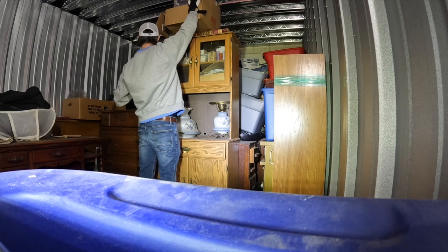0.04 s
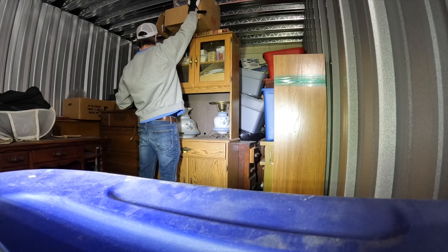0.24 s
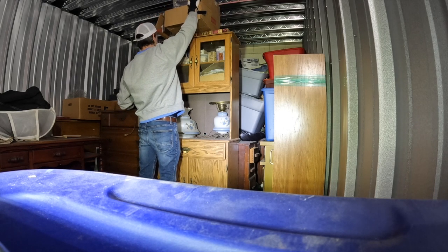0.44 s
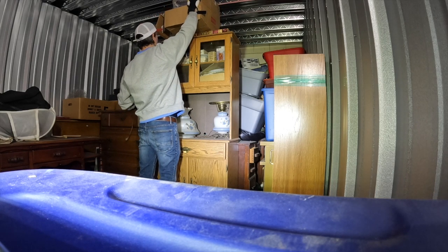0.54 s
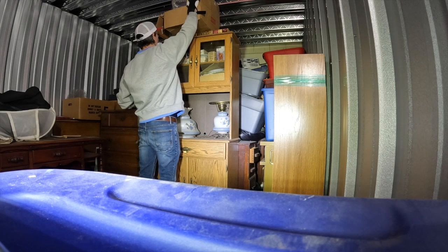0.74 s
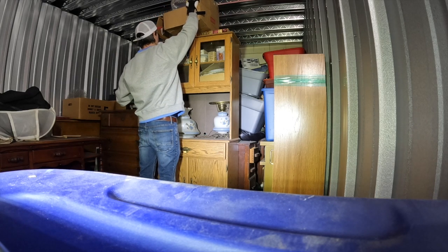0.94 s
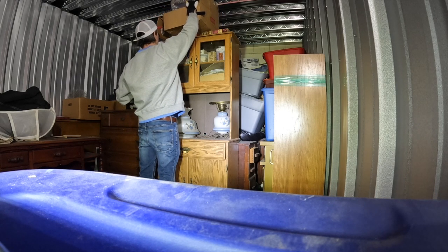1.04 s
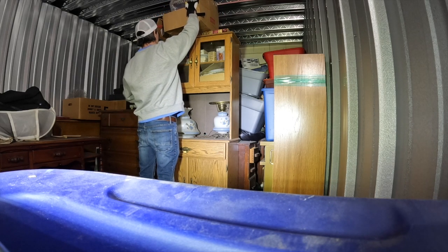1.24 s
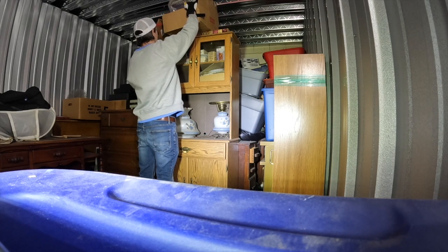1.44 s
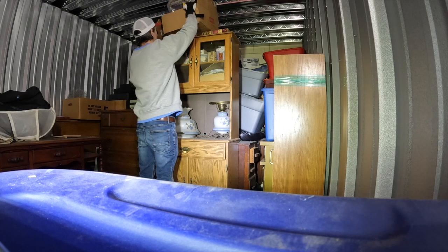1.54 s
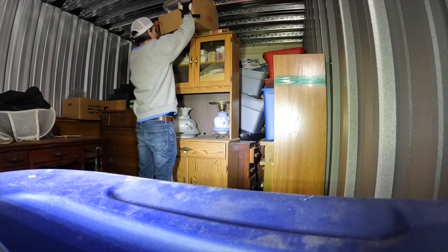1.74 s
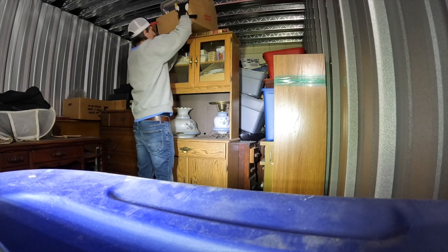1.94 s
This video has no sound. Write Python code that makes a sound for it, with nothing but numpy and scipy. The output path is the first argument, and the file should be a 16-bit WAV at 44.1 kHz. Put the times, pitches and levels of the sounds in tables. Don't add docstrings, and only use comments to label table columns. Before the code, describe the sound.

Three loud box knocks on wood in under a second, with a small corner bounce after the first, then quiet ticks, sleeve rustle and cardboard scraping, heard by a small camera microphone in a sheet-metal storage space.

```python
import sys
import numpy as np
from scipy import signal
from scipy.fft import rfft, irfft, next_fast_len
from scipy.io import wavfile
from scipy.ndimage import map_coordinates

SR = 44100
rng = np.random.default_rng(int(sys.argv[2]) if len(sys.argv) > 2 else 0)


def generate_wav(sig):
    pcm = np.round(np.clip(np.atleast_2d(sig).T, -1, 1) * 32767).astype(np.int16)
    wavfile.write(sys.argv[1], SR, pcm)


def how_loud(loudness_db):
    steps = np.asarray(loudness_db, float) / 20
    return 10 ** steps


N = 88200
SWELL_CYCLES = 1.59


def unit(x):
    return x / np.sqrt(np.mean(x ** 2) + 1e-20)


def along(points, hz):
    f, v = np.transpose(points)
    return np.interp(np.log(hz + 1), np.log(f + 1), v)


def curves(rows):
    s, *columns = np.transpose(rows)
    return [np.interp(np.arange(N) / SR, s, column) for column in columns]


def filtered(x, response):
    m = next_fast_len(N + 8192)
    return irfft(rfft(x, m) * response(np.fft.rfftfreq(m, 1 / SR)), m)[:N]


def shaped(points):
    return unit(filtered(rng.standard_normal(N), lambda hz: how_loud(along(points, hz))))


def resonant(peaks):
    def response(f):
        total = 0
        for k, (centre, width, db) in enumerate(peaks):
            peak = 1j * f * width / (centre * centre - f * f + 1j * f * width)
            total = total + (-1) ** k * how_loud(db) * peak
        return total
    return response


def add(track, s, sound):
    i = round(s * SR)
    sound = sound[max(-i, 0):][:N - max(i, 0)]
    track[max(i, 0):][:len(sound)] += sound


def swelling_mode(t, hz, t60, db):
    swell = 1 - np.exp(-t * hz / SWELL_CYCLES)
    return how_loud(db - 60 * t / t60) * np.sin(2 * np.pi * hz * t) * swell


def burst(colour_db, rise, hold, late_db=0):
    # frequency in Hz, time to fall by 60 dB in seconds, for the early sound.
    early_t60 = [(100, 0.41), (500, 0.18), (2000, 0.26), (5000, 0.34), (12000, 0.23)]
    # frequency in Hz, time to fall by 60 dB in seconds, for the late echoes.
    late_t60 = [(70, 1.9), (200, 1.66), (1000, 0.99), (4000, 0.4), (12000, .6)]
    # frequency in Hz, level of the late echoes in dB relative to the early sound.
    late_level = [(70, -35), (150, -19.5), (500, -17.5), (2000, -12.5), (10000, -66)]
    pad = np.zeros(N)
    pad[:SR] = rng.standard_normal(SR)
    noise = filtered(pad, lambda hz: how_loud(colour_db(hz)))[:SR]
    hz, t, bands = signal.stft(unit(noise), SR, nperseg=256)
    after = np.maximum(t - hold, 0)
    early_fall = how_loud(-60 * after / along(early_t60, hz)[:, None])
    late_start_db = late_db + along(late_level, hz)[:, None]
    late_fall = how_loud(late_start_db - 60 * after / along(late_t60, hz)[:, None])
    sound = signal.istft(bands * (early_fall + late_fall), SR, nperseg=256)[1][:SR]
    u = np.arange(SR) / SR
    fade_out = np.minimum(1, 10 * (1 - u))
    return sound * (1 - np.exp(-u / rise)) * fade_out


def thumps():
    # start in seconds, clatter level in dB, rise in seconds, hold in seconds, scuff level in dB.
    landings = [
        (.2375, -19.5, 0.00033, 0.062, -29.5),
        (.500, -27, 0.0039, 0.033, -45),
        (.746, -22, 0.0029, 0.051, -36.5),
    ]
    # frequency in Hz, level in dB per Hz.
    clatter_colours = [
        [(50, -14.5), (200, 2.5), (400, -3.5), (1000, -5), (1500, -7.5), (2200, -16), (5300, -22),
         (15000, -35.5)],
        [(50, -6), (200, -3.5), (500, -1.5), (1000, -9), (1500, -11), (3200, -18), (5300, -26.5),
         (15000, -41.5)],
        [(50, -6.5), (200, 0.5), (450, -2.5), (1000, -5.5), (1500, -13), (3200, -21), (5300, -28.5),
         (15000, -38.5)],
    ]
    crack_db = [
        -7,
        -10,
        -35,
    ]
    # frequency in Hz, level in dB per Hz.
    scuff_colour = [(250, -28), (800, -12), (1300, -13), (2000, -17), (3500, -24.5), (12000, -39.5)]
    # frequency in Hz, time to fall by 60 dB in seconds, level in dB in thumps 1,
    # 2 and 3.
    ringing_modes = [(68.9, 0.37, -10.5, -56, -10.5), (82, 0.31, -9.5, -16.5, -22.5),
                     (75.6, 0.36, -27.5, -12, -42), (129.4, 0.49, -21, -30, -46), (147.9, 0.32, -18, -29, -16),
                     (161.4, 0.31, -32.5, -28, -20.5), (177.2, 0.32, -35.5, -31, -21),
                     (249.5, 0.221, -12, -22.5, -29.5), (273.2, 0.26, -14, -21, -16),
                     (333.7, 0.34, -41, -27, -48), (414, 0.24, -28, -14, -22), (428, 0.24, -26, -19.5, -18),
                     (496, 0.48, -55, -34, -27.5), (543, 0.3, -36, -28.5, -50), (638, 0.11, -31, -35, -21),
                     (754.4, 0.58, -27, -57, -48), (797, 0.36, -46, -31, -31), (829, 0.24, -45, -54, -38),
                     (899, 0.34, -35, -31.5, -24), (977, 0.48, -26.5, -40, -27.5),
                     (1050, 0.21, -43.5, -34, -17.5), (1143, 0.3, -41, -46, -38),
                     (1214, 0.11, -40, -46, -35), (1328, 0.11, -18.5, -37, -48), (1434, 0.1, -24, -41, -49)]
    crack_s, scuff_s, scuff_rise_db = 0.0089, 0.03, 33
    scuff_n = round(scuff_s * SR)
    out, t = np.zeros(N), np.arange(SR // 2) / SR
    for k, (s, db, rise, hold, scuff_db) in enumerate(landings):
        clatter = burst(lambda hz: along(clatter_colours[k], hz), rise, hold)
        crack = how_loud(crack_db[k]) * np.exp(-np.arange(SR) / SR / crack_s)
        add(out, s, how_loud(db) * clatter * (1 + crack))
        growth = how_loud(scuff_db + np.linspace(-scuff_rise_db, 0, scuff_n))
        add(out, s - scuff_s, growth * shaped(scuff_colour)[:scuff_n])
        for j, (hz, t60, *levels) in enumerate(ringing_modes):
            add(out, s, (-1) ** j * swelling_mode(t, hz, t60, levels[k]))
    return out


def bounce():
    # frequency in Hz, level in dB per Hz.
    corner_colour = [(100, 0), (600, 1), (1400, -2.5), (2500, -3), (3500, -16), (5000, -24.5), (15000, -35)]
    out = np.zeros(N)
    add(out, 0.384, how_loud(-27.5) * burst(lambda hz: along(corner_colour, hz), rise=0.004, hold=0.02))
    return out


def nudges():
    # start in seconds, frequency in Hz, time to fall by 60 dB in seconds, level in dB.
    soft_contacts = [(.395, 71, 0.22, -39), (0.497, 286, 0.081, -22.5), (0.502, 271, 0.077, -34),
                     (.51, 137, 0.26, -21.5), (.51, 558, 0.22, -28.5), (.268, 182, 0.14, -18.5),
                     (.24, 602, 0.055, -16), (0.304, 160.6, .15, -19), (.37, 203, 0.1, -25),
                     (0.461, 157, 0.17, -39), (0.644, 81, .25, -40), (.748, 278, 0.1, -10),
                     (0.759, 146, 0.089, -14), (0.746, 970, 0.049, -25), (0.814, 398, 0.1, -25),
                     (1.09, 70, .3, -52), (1.149, 70.8, 0.34, -53.5), (1.241, 64.4, .3, -57),
                     (1.401, 191, 0.17, -59), (1.439, 70, .25, -50), (1.85, 273, 0.21, -42),
                     (0.821, 181, 0.11, -15.5), (0.839, 72, 0.087, -44), (0.927, 151.6, 0.44, -35.5),
                     (0.989, 251, 0.24, -39), (1.03, 149.6, 0.56, -43.5), (1.481, 149, 0.28, -58),
                     (1.525, 71, 0.31, -45), (1.56, 159, 0.14, -36.5), (1.595, 194, 0.14, -41),
                     (1.964, 160, .12, -27), (1.976, 120, 0.11, -30), (1.993, 133, 0.13, -23.5)]
    # start in seconds, frequency in Hz, level in dB.
    corner_ticks = [(0.2371, 1310, -15.5), (.7452, 1050, -20), (0.7465, 1110, -16), (1.331, 1890, -45),
                    (1.334, 920, -43), (1.339, 1280, -39), (1.559, 2500, -40), (1.566, 980, -46),
                    (0.3858, 2500, -21), (0.3903, 1500, -15), (0.3931, 2170, -26), (0.3969, 1470, -18),
                    (0.4041, 1510, -22), (0.407, 1720, -19), (0.415, 2850, -24), (.4265, 1900, -23),
                    (0.432, 1800, -21)]
    tick_cycles = 10
    out, t = np.zeros(N), np.arange(SR // 2) / SR
    for s, hz, t60, db in soft_contacts:
        add(out, s, swelling_mode(t, hz, t60, db))
    for s, hz, db in corner_ticks:
        add(out, s, how_loud(db - 60 * t * hz / tick_cycles) * np.sin(2 * np.pi * hz * t))
    return out


def taps():
    # start in seconds, level in dB, edge of brightness in Hz, bass boost in dB, hold in seconds.
    touches = [(-.04, -53, 4340, 3, 0.074), (0.091, -54, 3050, 5, 0.046), (0.905, -53.5, 2960, -5, .01),
               (0.984, -47, 4100, 6, 0.031), (1.096, -52, 3900, 5, 0.039), (1.219, -56, 3350, -1, 0.019),
               (1.327, -48.5, 2780, -8, 0.024), (1.413, -56.5, 4200, 3, 0.0044),
               (1.558, -43.5, 7800, -5.5, 0.0074), (1.655, -51, 3870, -5, 0.0095),
               (1.847, -50.5, 650, -5, 0.026), (1.965, -50.5, 4200, 1, 0.013),
               (1.996, -55, 15060, -7, 0.0097)]
    # frequency in Hz, level in dB per Hz.
    tap_colour = [(50, -17), (150, 1.5), (400, 8), (1200, -0.5), (2200, 0), (4000, -8), (7000, -16),
                  (15000, -25)]
    dull_db = -9.5
    out = np.zeros(N)
    for s, db, edge_hz, bass_db, hold in touches:
        def colour(hz):
            dulling = dull_db * (1 - 1 / (1 + (hz / edge_hz) ** 10))
            bass = bass_db * 2 / (1 + (hz / 500) ** 2)
            return along(tap_colour, hz) + dulling + bass
        late_db = -32 * (s > 0)
        add(out, s, how_loud(db) * burst(colour, 0.00042, hold, late_db))
    return out


def judder():
    # time in seconds, slips a second, level in dB.
    slipping = [
        (1.8, 223, -99),
        (1.83, 268, -49),
        (1.875, 218, -53.5),
        (1.895, 225, -44.5),
        (1.925, 200, -42.5),
        (1.95, 190, -48),
        (1.97, 175, -38),
        (1.985, 146, -37),
        (2, 130, -44),
    ]
    # frequency in Hz, width in Hz, level in dB.
    panel = [(172, 67, -7.5), (444, 72, -18.5), (560, 50, -16.5), (824, 12, -11.5), (1020, 46, -21)]
    rate, level_db = curves(slipping)
    drift = map_coordinates(rng.standard_normal(300), [np.arange(N) * 120 / SR])
    slip_count = np.floor(np.cumsum(rate * (1 + 0.07 * drift)) / SR)
    slips = np.diff(slip_count, prepend=0) * how_loud(2.5 * rng.standard_normal(N))

    def card(f):
        return resonant(panel)(f) / (1 + 1j * f / 1060) ** 2
    return how_loud(level_db) * (level_db > -69) * unit(filtered(slips, card))


def rub():
    # time in seconds, level in dB.
    rub_level = [
        (1.45, -95),
        (1.495, -54.5),
        (1.53, -51.5),
        (1.62, -55),
        (1.7, -53.5),
        (1.8, -52),
        (1.9, -55),
        (2, -38),
    ]
    # frequency in Hz, level in dB per Hz.
    rub_colour = [(50, -32), (110, -23), (220, 19), (600, 10), (1500, 9.5), (3200, 5), (6800, -4),
                  (15000, -2.5)]
    grains_per_s, grain_db, smear_db = 3000, 2.5, 3
    level_db, = curves(rub_level)
    draw = rng.random((2, N))
    strength = how_loud(-grain_db * np.log(1 - draw[1]))
    grains = (draw[0] < grains_per_s / SR) * strength * rng.choice([-1, 1], N)
    rough = unit(grains) + how_loud(smear_db) * rng.standard_normal(N)
    return how_loud(level_db) * unit(filtered(rough, lambda hz: how_loud(along(rub_colour, hz))))


def rocking():
    # time in seconds, level in dB.
    rock_level = [(.85, -69), (.96, -47.5), (1.1, -49), (1.25, -59), (1.35, -68), (1.5, -61.5),
                  (1.57, -51.5), (1.65, -65), (1.8, -65.5), (1.95, -56), (2, -45.5)]
    # frequency in Hz, width in Hz, level in dB.
    boom_modes = [(68.6, 3.7, -7), (153.5, 14, -6.5), (252, 32, -11)]
    level_db, = curves(rock_level)

    def boom(f):
        return resonant(boom_modes)(f) / (1 + (f / 330) ** 4)
    return how_loud(level_db) * (level_db > -69) * unit(filtered(rng.standard_normal(N), boom))


def sleeve():
    # time in seconds, level in dB.
    brush_level = [(0, -90), (.1, -98), (.11, -60.5), (.2, -81), (.95, -64), (1.01, -54.5), (1.06, -65),
                   (1.12, -58.5), (1.2, -65.5), (1.415, -72), (1.425, -56), (1.5, -70), (1.65, -62),
                   (1.74, -53), (1.81, -58), (1.85, -51.5), (1.95, -54), (2, -44)]
    # frequency in Hz, level in dB per Hz.
    cloth_colour = [(2000, -25), (4500, -3.5), (6800, 0), (9500, 1), (12500, 4), (14500, 1.5), (16000, -33)]
    return how_loud(curves(brush_level)[0]) * shaped(cloth_colour)


def squeak():
    start_s, length_s, pitch_hz, level_db = 1.7, 0.085, 1025, -60
    out, t = np.zeros(N), np.arange(round(length_s * SR)) / SR
    tone = np.sin(2 * np.pi * pitch_hz * t * (1 - 0.13 * t))
    add(out, start_s, how_loud(level_db) * np.hanning(len(t)) * tone)
    return out


def earlier():
    # frequency in Hz, level in dB per Hz.
    knock_colour = [(60, -13), (150, -2), (280, -4), (700, 1), (1500, -0.5), (2600, -16.5), (3800, -13.5),
                    (5000, -36)]
    level_db, t60 = -42, 0.62
    return how_loud(level_db - 60 * np.arange(N) / SR / t60) * shaped(knock_colour)


def air():
    # time in seconds, change of the noise in dB.
    lull = [
        (0, 2.5),
        (.2, 2),
        (.6, 0.5),
        (1.2, 2.3),
        (1.3, -0.5),
        (1.43, 5.5),
        (1.47, -1.5),
        (1.5, -.1),
        (2, 6),
    ]
    # frequency in Hz, level in dB per Hz.
    air_colour = [(40, -11), (110, -21), (250, -12.5), (600, -20.5), (1500, -20.5), (3200, -25.5),
                  (6800, -41.5), (15000, -39)]
    # frequency in Hz, level in dB per Hz.
    rumble_colour = [(18, -15), (30, 12), (55, -10), (90, -46)]
    air_db, rumble_db = -62.5, -91
    return how_loud(air_db + curves(lull)[0]) * shaped(air_colour) + how_loud(rumble_db) * shaped(rumble_colour)


def scene():
    box = thumps() + bounce() + nudges() + taps() + judder() + rub()
    around = rocking() + sleeve() + squeak() + earlier() + air()
    return (box + around)[None]


def low_pass(x):
    return signal.sosfilt(signal.butter(12, 15741, fs=SR, output="sos"), x)


def record(dry):
    # frequency in Hz, microphone gain in dB.
    mic_colour = [(3200, 1.41), (4300, -0.5), (5300, -6), (6800, -2.5), (8500, -12.5), (10500, -14.5),
                  (12500, -16.5), (15300, -23)]
    bass_edge_hz, ceiling = 37.8, 0.79

    def microphone(hz):
        return how_loud(along(mic_colour, hz)) * 1j * hz / (bass_edge_hz + 1j * hz)
    heard = filtered(dry[0], microphone)
    mix = ceiling * np.tanh(heard / ceiling)
    return low_pass(mix[None])


dry = scene()
out = record(dry)
generate_wav(out)
```